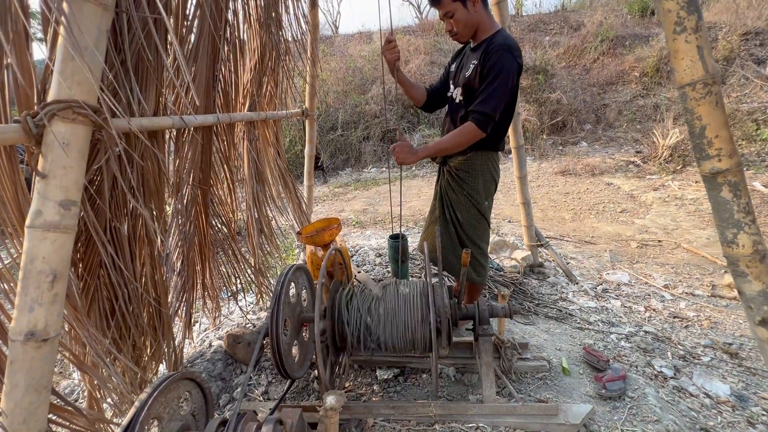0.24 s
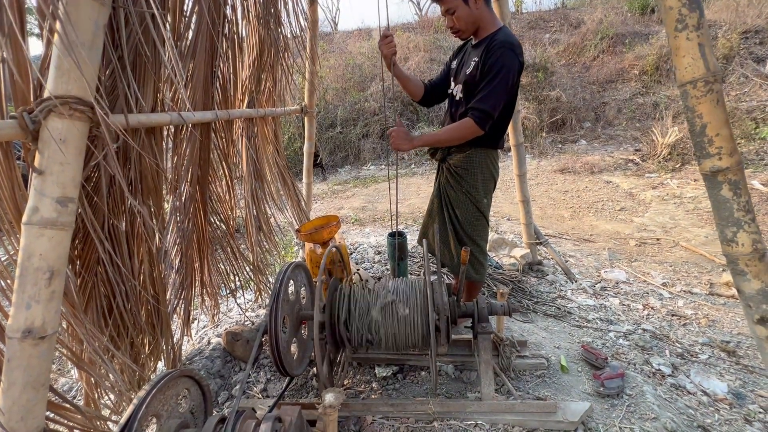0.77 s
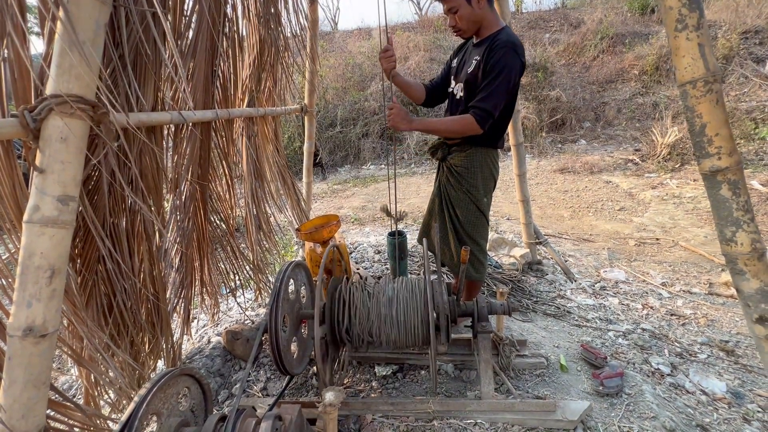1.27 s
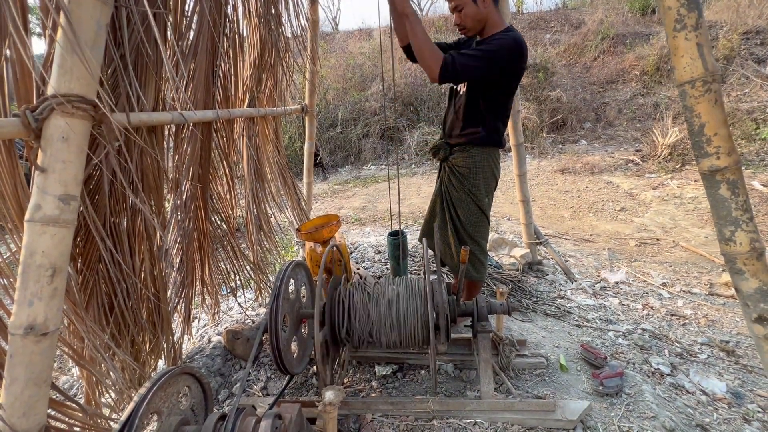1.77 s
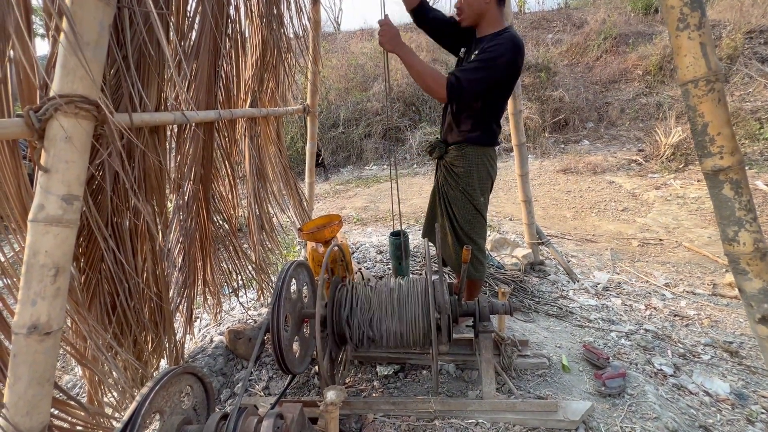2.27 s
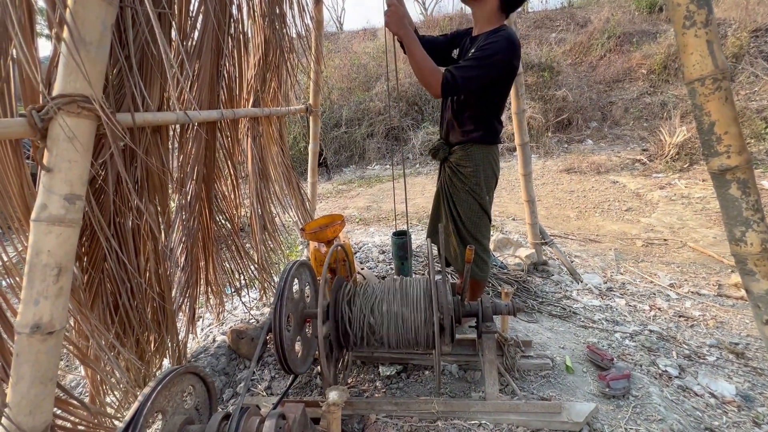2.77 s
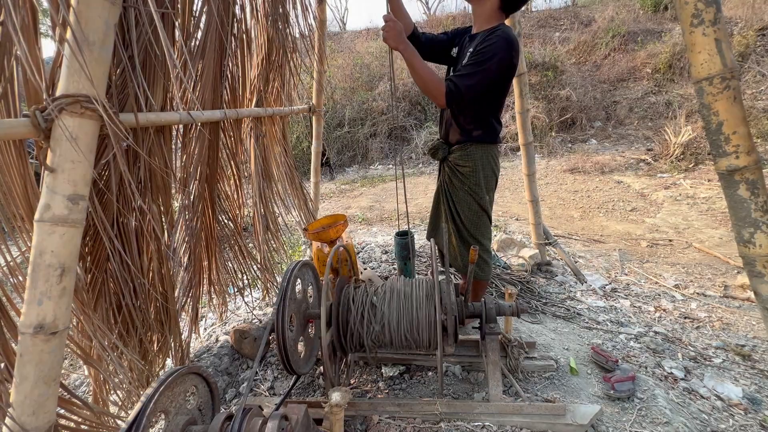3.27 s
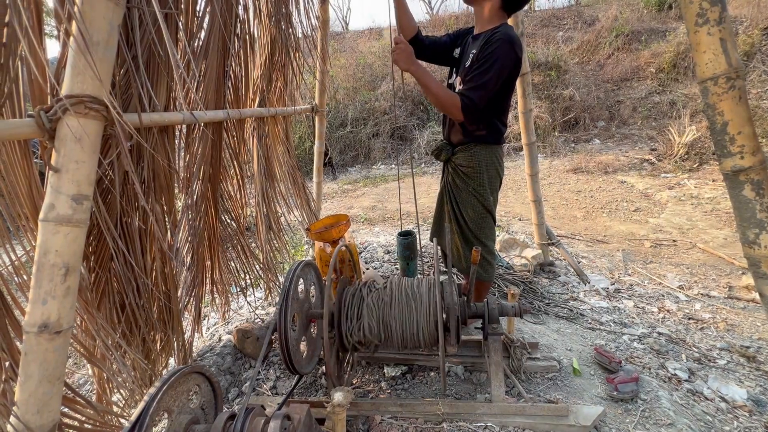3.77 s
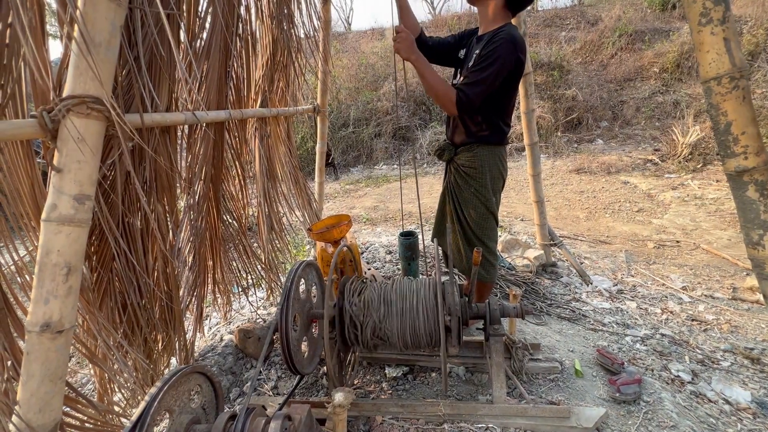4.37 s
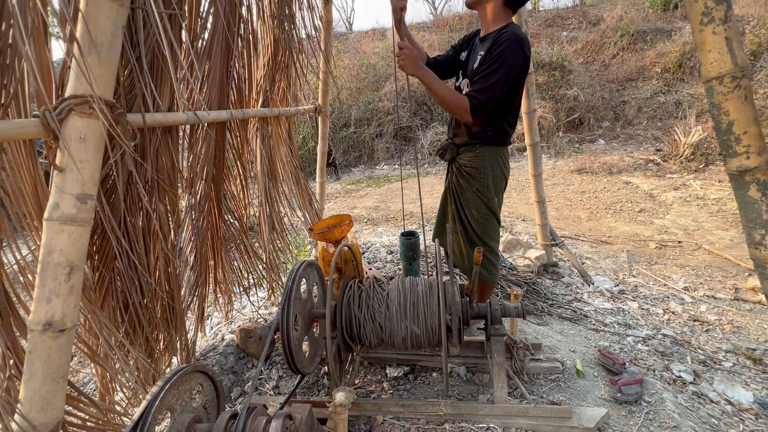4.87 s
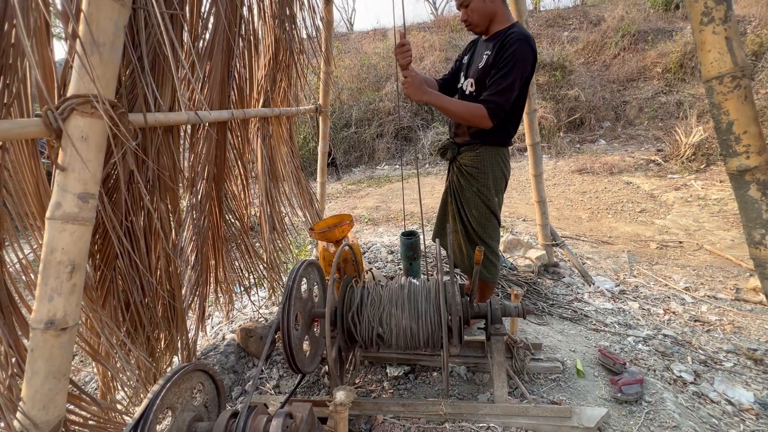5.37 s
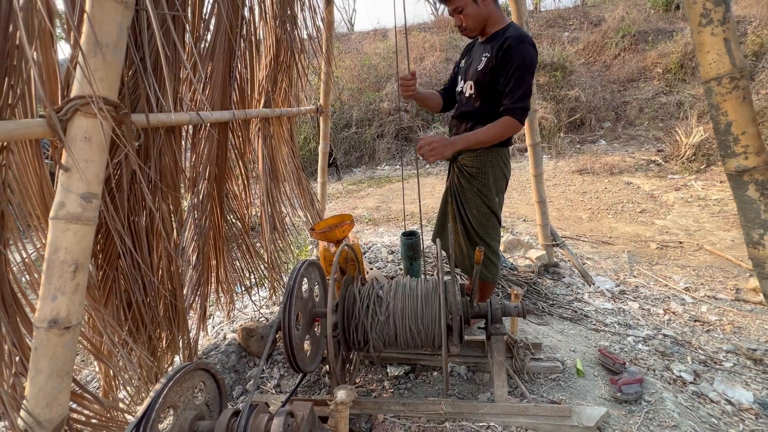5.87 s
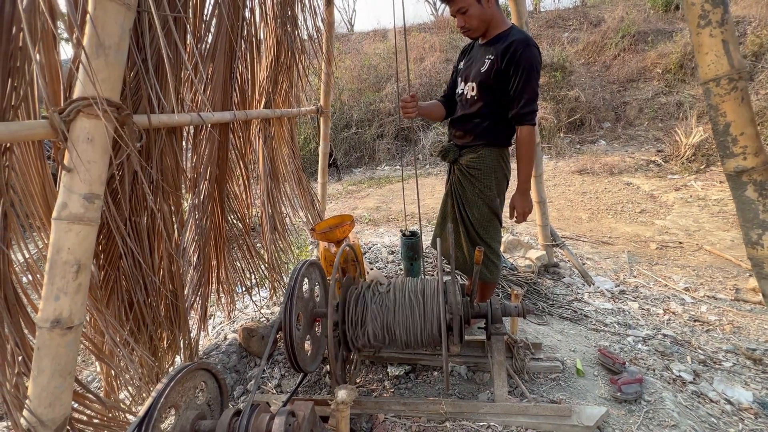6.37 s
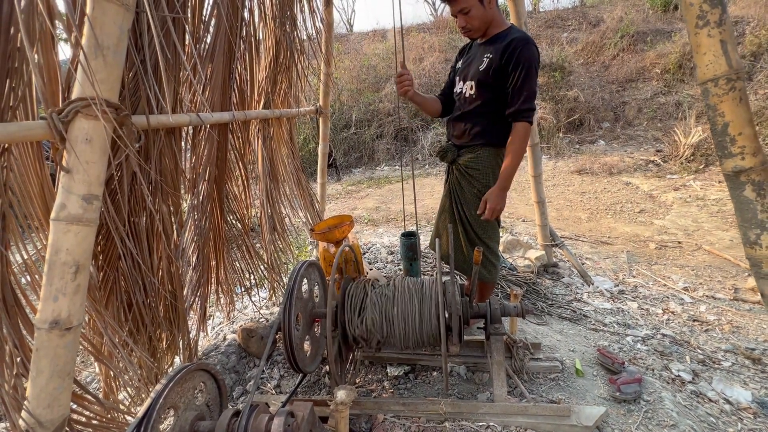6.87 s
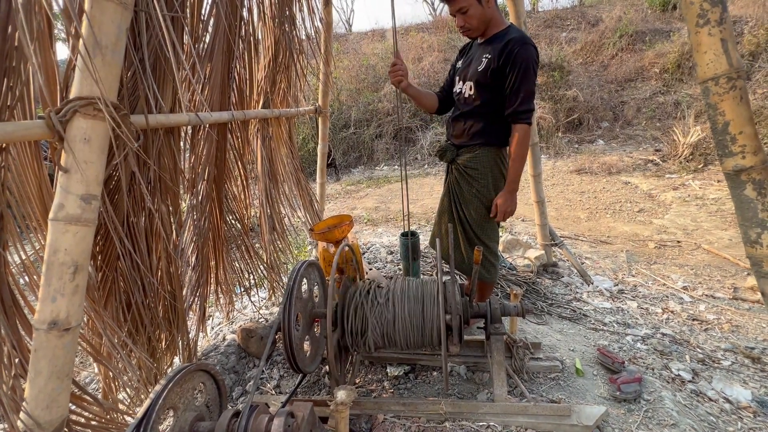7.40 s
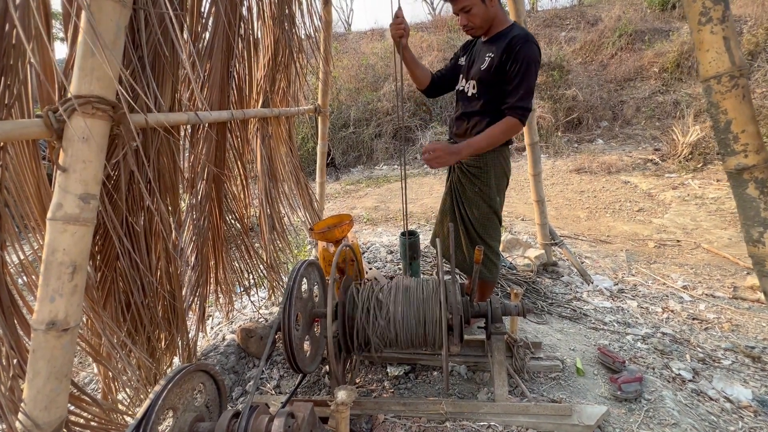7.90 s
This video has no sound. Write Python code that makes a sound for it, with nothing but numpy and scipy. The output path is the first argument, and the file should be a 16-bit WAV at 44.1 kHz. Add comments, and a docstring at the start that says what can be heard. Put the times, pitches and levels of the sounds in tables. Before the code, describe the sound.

Steel cable clatters and scrapes over a small iron winch drum in quick uneven bursts, with wire squeaks and snaps, outdoors in a faint breeze.

```python
"""A small winch at a hand-worked oil well pays out steel cable, a few metres from a phone under a thatched shelter.
Drum, wheel and cable knock and scrape in quick uneven bursts: runs of tiny impacts drive damped and ringing modes.
Wires squeak and snap (chirps, noise cracks), loose parts tap (decaying sines), the wooden base thuds (low noise).
The axle rubs softly (coloured noise), the shelter adds a short dull tail, and a breeze rumbles on the microphone."""
import sys
import numpy as np
from scipy import signal
from scipy.fft import rfft, irfft
from scipy.io import wavfile

SR = 44100
rng = np.random.default_rng(int(sys.argv[2]) if len(sys.argv) > 2 else 0)


def log_audio(samples):
    """Write samples as a 16-bit WAV file to the path given in sys.argv[1]."""
    # one column per channel
    frames = np.atleast_2d(samples).T
    # limit to full scale, then quantise
    limited = np.clip(frames, -1, 1)
    pcm = np.round(limited * 32767).astype(np.int16)
    wavfile.write(sys.argv[1], SR, pcm)


N = 358974
RING_SIZE = 8192  # samples per contact
TIME_S = np.arange(N) / SR
AGE_S = np.arange(RING_SIZE) / SR
FREQS_HZ = np.fft.rfftfreq(RING_SIZE, 1 / SR)
SCENE_FREQS_HZ = np.fft.rfftfreq(N, 1 / SR)
LEFT_RIGHT = np.array([[1], [-1]])
TYPICAL_DB = -8.5  # strength of a typical burst

# phase by which the left port leads the right: (frequency [Hz], phase [rad])
PORT_LEAD = [(200, 0.5), (600, 0.4), (2550, 1.01), (2900, 0.67), (3700, 2.5), (5100, 5.5), (6400, 7.5),
             (7700, 7), (9500, 9.5), (11500, 11.5)]


def clatter(ring_db=18, squeak_db=-8, thin_squeak=0.97, knock_s=0.0001, rasp_s=0.00055, level_db=-23):
    """Impacts drive the damped frame and the ringing drum; squeaks stand out where clunk and edge are weak."""
    out = np.zeros((2, N))
    lead_rad = np.interp(FREQS_HZ, *np.transpose(PORT_LEAD))
    ports = np.exp(-1j * lead_rad * np.array([[0], [1]]))
    clunk_band = np.interp(FREQS_HZ, [200, 700, 1350, 1900], [0, 1, 1, 0])
    edge_band = np.interp(FREQS_HZ, [3050, 3800], [0, 1])
    fine = np.minimum(FREQS_HZ / (SR / 4), 1)
    for time_s, db, length_ms, clunk_db, edge_db in np.vstack([contacts(), stray_ticks()]):
        # the whole cable knocks at once; its fine strands rasp in the treble a moment later
        knock = np.sqrt(1 - fine) * scrape(length_ms, knock_s)
        rasp = np.sqrt(fine) * scrape(length_ms + 2, rasp_s)
        # spectra multiply: the impacts excite every mode
        iron = unit(irfft((knock + rasp) * (clash() + undb(ring_db) * ring())))
        squeak_level_db = squeak_db - thin_squeak * (clunk_db + edge_db) / 2
        squeak = unit(irfft(squeaks(length_ms))) * undb(squeak_level_db)
        tone_db = clunk_db * clunk_band + edge_db * edge_band
        blow = rfft(unit(iron + squeak)) * undb(db + level_db + tone_db)
        add(out, time_s, waveform(blow * ports))
    return out


# bursts of the cable on the drum: (time [s], relative strength [dB], scrape length [ms], treble edge [dB])
BURSTS = [(0.024, -9.5, 31, 2.5), (.054, -10.5, 3.5, -2), (0.152, -14, 5.6, -1.5), (0.184, -16.5, 7.1, 8.5),
          (.3, -2, 25, -5.5), (.344, -9, 34, -1), (.349, -7.5, 2.4, 6.5), (0.403, -13, 14, 3),
          (0.435, -14, 53, -4), (.519, -6, 16, -0.5), (0.614, -19.5, 3, 1), (0.664, -15.5, 3.5, 7.5),
          (0.782, -6, 23, -1.5), (0.828, -6, 9.9, -3), (.854, -7, 20, 1.5), (0.887, -8.5, 23, 3),
          (0.964, -11, 16, -1), (.987, -10.5, 14, 3), (1.156, -13.5, 6.4, 4.5), (1.243, -4.5, 37, -1.5),
          (1.255, -4.5, 2.5, -10), (1.304, -16.5, 14, 4.5), (1.344, -12, 9.2, -0.5), (1.362, -7, 20.3, 1.5),
          (1.425, -16.5, 35, -3), (1.471, -8, 16, 2), (1.616, -12.5, 10, 1), (1.643, -13.5, 15, 0),
          (1.741, -5.5, 22, -2), (1.814, -5, 12, -5), (1.866, -11.5, 3.4, 1.5), (1.911, -9, 36, -2),
          (1.977, -8.5, 6.4, -2), (2.133, -11, 28, -1.5), (2.182, -18.5, 2.1, 8), (2.268, -5.5, 19, -6.5),
          (2.355, -5.5, 42, -4), (2.479, -12.5, 16.5, -1), (2.521, -8, 16, 0), (2.656, -6.5, 6.1, -5.5),
          (2.691, -11, 30, -5), (2.837, -7.5, 18, 4), (2.894, -7.5, 51, -1), (2.939, -9, 27, -4),
          (2.978, -12.5, 18, 2.5), (3.041, -13, 46, 2), (3.09, -9, 16, 0), (3.221, -6.5, 7, -1),
          (3.274, -18, 8, 8), (3.398, -5, 4, 0), (3.411, -6, 40, -1.5), (3.482, -8, 40, -1.5),
          (3.538, -8.5, 5.3, -6.5), (3.592, -12, 9.4, 0), (3.64, -11, 27, 0.5), (3.81, -21.5, 9.1, 6),
          (3.828, -14, 5, -5), (3.854, -13, 8.5, 3.5), (3.899, -16, 90, -5.5), (4.036, -9.5, 17, -1.5),
          (4.114, -19, 11, -2), (4.136, -7.5, 41, -2.5), (4.223, -16, 14, 1), (4.278, -14.5, 46, -0.5),
          (4.338, -12.5, 6.5, 1), (4.556, -16, 5.5, 5.5), (4.722, -6, 14.5, -0.5), (4.827, -9.5, 19, -3),
          (4.922, -16, 20, 1.5), (5.018, -10, 12.3, 1), (5.177, -11.5, 6.5, -7.5), (5.218, -14.5, 43, 0),
          (5.373, -6, 23.6, -0.5), (5.49, -9, 3, -3), (5.512, -2.5, 26.6, -1), (5.638, -16.5, 20, 1.5),
          (5.669, -8, 9.7, -0.5), (5.824, -14, 11, -6), (5.873, -18, 3.3, -2.5), (5.9, -16, 24, 1),
          (5.974, -8, 16, -3), (6.008, -8.5, 18.8, -6), (6.105, -6, 31, 0), (6.234, -14.5, 19, 3),
          (6.275, -7, 22, -0.5), (6.402, -7.5, 24, -4), (6.536, -8.5, 23, 0.5), (6.639, -13.5, 50, -3),
          (6.677, -6.5, 45, -1), (6.701, -6.5, 34, 0), (6.802, -8.5, 6.2, 2), (6.919, -11, 5.7, -3),
          (6.944, -13, 37, 0), (7.017, -11.5, 11.5, -3.5), (7.09, -8, 22, 4), (7.156, -7.5, 7, -4.5),
          (7.174, -4, 50, -2), (7.277, -8.5, 11, -2), (7.289, -9, 5.1, 2), (7.401, -7.5, 27, -4),
          (7.477, -9.5, 4.9, -1.5), (7.523, -15, 19, 1.5), (7.581, -1.5, 33, -2.5), (7.644, -3, 46, 0.5),
          (7.752, -5, 8.1, 1), (7.874, -10.5, 49, -3), (8.013, -2.5, 56, -1.5), (8.074, -1, 62, 0)]


def contacts(clunk_db=1.5, clunk_per_edge=0.41, clunk_per_strength=-0.17):
    """Bursts and grazes; hard bites ring more than they clunk: rows (s, dB, length ms, clunk dB, edge dB)."""
    time_s, db, length_ms, edge_db = np.vstack([BURSTS, grazes()]).T
    clunks_db = clunk_db + clunk_per_edge * edge_db + clunk_per_strength * (db - TYPICAL_DB)
    return np.column_stack([time_s, db, length_ms, clunks_db, edge_db])


def grazes(lead_s=0.04, scatter_s=0.0059, graze_db=-13.5, follows=0.47, length_ms=12, edge_db=1.5, pause_s=0.075):
    """After a pause the cable grazes the drum just before it bites: rows like those of the bursts."""
    time_s, db, _, _ = np.transpose(BURSTS)
    early, length, edge = rng.standard_normal((len(time_s), 3)).T
    rows = np.column_stack([
        time_s - lead_s + scatter_s * early,
        TYPICAL_DB + graze_db + follows * (db - TYPICAL_DB),
        length_ms * np.exp(0.4 * length),
        edge_db + 2 * edge])
    return rows[np.diff(time_s, prepend=-1) > pause_s]


# course of the light rattle: (time [s], relative level [dB])
RATTLE_LEVEL = [(0.0, -41), (0.32, -35), (3.54, -32), (3.67, -51), (4.15, -36.5), (4.4, -35), (4.78, -35.5),
                (5.87, -36.5), (6.05, -25.5), (6.71, -42.5), (7.07, -31), (8.14, -34)]


def stray_ticks(level_db=12, spread_db=3, length_ms=7, length_spread=0.71, clunk_db=4, edge_db=2, count=70):
    """Slack turns of cable tap and rub lightly at random: rows like those of the contacts."""
    jitter = rng.random(count)
    size, length, clunk, edge = rng.standard_normal((count, 4)).T
    times_s = (np.arange(count) + jitter) / count * N / SR
    db = np.interp(times_s, *np.transpose(RATTLE_LEVEL)) + level_db + spread_db * size
    lengths_ms = length_ms * np.exp(length_spread * length)
    return np.column_stack([times_s, db, lengths_ms, clunk_db + 4 * clunk, edge_db + 3 * edge])


def scrape(length_ms, attack_s, spread_db=6, impacts_hz=2500, judder_db=5.5, judder_hz=297.0, bite_db=3, bite_s=0.0025):
    """Spectrum of one contact: wire strands catch in a juddering run of tiny impacts that dies away."""
    pressure = (1 - np.exp(-AGE_S / attack_s)) * np.exp(-(1000 * AGE_S / max(length_ms, 1)) ** 2)
    catches = rng.random(RING_SIZE) < impacts_hz / SR
    scatter_db = spread_db * rng.standard_normal(RING_SIZE).clip(-2, 2)
    first_bite_db = bite_db * np.exp(-AGE_S / bite_s)  # the first strands bite hardest
    sizes = undb(scatter_db + judder_db * walk(AGE_S, judder_hz) + first_bite_db)
    signs = rng.choice([-1, 1], RING_SIZE)
    return rfft(unit(catches * sizes * signs * np.sqrt(pressure) + 1e-18))  # offset avoids 0/0


# drum and wheel modes: (frequency [Hz], relative left level [dB], relative right level [dB], 60 dB decay [s])
RING_MODES = [(702, -22, -27, 0.017), (1209.7, -6, -3.5, 0.08), (1298, -13, -3.5, 0.16),
              (1378, -10.5, -8.5, 0.27), (1862, -14, -7, 0.27), (2170, -47, -4.5, 0.019),
              (2560, -8, 2, 0.05), (2661, -8, 4, 0.24), (2675, 5, 6.5, 0.099), (2880, -37, -9.5, 0.21),
              (3004, -3, -4, 0.19), (3550, -19, -36, 0.018), (3290, -1, -22, 0.061), (3475, -4, -16, 0.11),
              (3780, -2.5, -11, 0.065), (4385, 3.5, -1, 0.026), (5047, -17, -4.5, 0.085),
              (5760, 0, -44, 0.17), (6000, -10, -5, 0.047), (6210, 1.5, -1, 0.015), (6050, 3, -4.5, 0.07)]


def ring(detune=0.0068, spot_db=2.5, port_scatter_rad=0.3):
    """Spectrum of the iron modes, resonant peaks; each contact spot weights and detunes them differently."""
    hz, left_db, right_db, t60_s = np.transpose(RING_MODES)
    shift, weight, turn, skew = rng.standard_normal((4, len(hz)))
    half_width_hz = (np.log(1000) / (2 * np.pi * t60_s))[:, None]
    mode_hz = (hz * (1 + detune * shift))[:, None]
    shapes = np.sqrt(half_width_hz) / (half_width_hz + 1j * (FREQS_HZ - mode_hz))
    phases_rad = 2 * np.pi * turn + port_scatter_rad * skew * LEFT_RIGHT
    gains = undb(np.array([left_db, right_db]) + spot_db * weight) * np.exp(1j * phases_rad)
    return np.einsum("cm,mf->cf", gains, shapes)


# colour of the frame and cable: (frequency [Hz], relative left level [dB], relative right level [dB])
CLASH_COLOUR = [(90, -33, -19.5), (264, -13, -8.5), (500, -14.5, -8), (690, -10.5, -3.5), (1010, -13, -8.5),
                (1360, -2, -4), (1620, -6.5, -4.5), (2770, -5, 5), (3550, 0.5, -4), (4800, -1, -13),
                (6580, -7, -5.5), (7240, -10.5, -22), (9110, -10, -15.5), (10070, -21, -18.5),
                (16300, -32, -34)]


def clash(t60_s=0.053, tick_gain=0.089, likeness=0.58):
    """Spectrum of dense damped modes: a direct tick plus a short noise hash that the two ports partly share."""
    shared, *own = unit(rng.standard_normal((3, RING_SIZE)) * fade(AGE_S, t60_s)) / np.sqrt(RING_SIZE)
    hash_noise = np.sqrt(likeness) * shared + np.sqrt(1 - likeness) * np.array(own)
    return colour(CLASH_COLOUR, FREQS_HZ) * (rfft(hash_noise) + tick_gain)


def squeaks(length_ms, pitches_hz=(2350, 2800, 2950, 3100, 6100), scatter=0.056, swell_s=0.002, spread_db=5,
            pan_db=5, count=3):
    """Spectrum of single wires that stick and slip: chirps of a few milliseconds within a contact."""
    pitch, size, pan = rng.standard_normal((3, count, 1))
    hz = rng.choice(pitches_hz, (count, 1)) * (1 + scatter * pitch)
    starts_s = rng.random((count, 1)) * length_ms / 1000
    age_s = np.maximum(AGE_S - starts_s, 0)
    swell = age_s * np.exp(-age_s / swell_s)
    chirps = swell * np.sin(2 * np.pi * hz * age_s) * undb(spread_db * size)
    return rfft(undb(pan_db * pan.T * LEFT_RIGHT) @ chirps)


# single wires snapping over the ridges of the winding: (time [s], relative level [dB])
WIRE_SNAPS = [(0.185, -33), (0.6664, -28), (1.1603, -24), (1.5224, -18), (1.6182, -37), (1.8692, -29),
              (2.6604, -25), (3.2226, -21), (4.7227, -37), (5.1781, -49), (5.5154, -22), (6.108, -24),
              (6.4033, -32), (6.797, -37), (6.9217, -27), (7.0933, -31), (7.3475, -19.5), (7.481, -22),
              (7.58, -28), (8.089, -17)]


def snaps(low_hz=3000, high_hz=14000, t60_s=0.02, level_db=-5):
    """A taut wire lets go with one short, bright crack of decaying noise."""
    out = np.zeros((2, N))
    band = signal.butter(1, [low_hz, high_hz], "bandpass", fs=SR, output="sos")
    for time_s, db in WIRE_SNAPS:
        crack = signal.sosfilt(band, rng.standard_normal((2, RING_SIZE)) * fade(AGE_S, t60_s))
        add(out, time_s, undb(db + level_db) * crack)
    return out


# hollow knocks of loose parts: (time [s], relative level [dB], pitch [Hz])
LOOSE_KNOCKS = [(0.121, -26, 791), (0.602, -27, 750), (0.629, -46, 554), (1.092, -25, 740),
                (1.109, -36, 970), (3.288, -22.5, 471), (3.781, -31, 740), (4.461, -28.5, 732)]


def knocks(t60_s=0.033, attack_s=0.0027, level_db=-2.5):
    """A loose part taps and rings briefly at one pitch."""
    out = np.zeros((2, N))
    for time_s, db, hz in LOOSE_KNOCKS:
        envelope = (1 - np.exp(-AGE_S / attack_s)) * fade(AGE_S, t60_s)
        tone = np.sin(2 * np.pi * hz * AGE_S) * envelope
        add(out, time_s, undb(db + level_db) * tone[None])
    return out


# dull knocks of the wooden base: (time [s], relative level [dB])
BASE_THUDS = [(0.526, -40), (0.748, -56), (3.287, -42.5), (7.76, -52)]


def thuds(low_hz=130, high_hz=480, t60_s=0.19, level_db=-7):
    """The timber base knocks dully: decaying noise in a low band."""
    out = np.zeros((2, N))
    wood = signal.butter(2, [low_hz, high_hz], "bandpass", fs=SR, output="sos")
    for time_s, db in BASE_THUDS:
        knock = unit(signal.sosfilt(wood, rng.standard_normal((1, RING_SIZE)) * fade(AGE_S, t60_s)))
        add(out, time_s, undb(db + level_db) * knock)
    return out


# course of the axle rub: (time [s], relative level [dB])
AXLE_LEVEL = [(0.0, -43), (3.54, -48.5), (3.66, -50), (4.14, -49.5), (5.16, -50), (5.58, -43),
              (6.42, -47.5), (8.14, -43.5)]
# spectrum of the axle rub: (frequency [Hz], relative density [dB per Hz])
AXLE_SPECTRUM = [(60, -21), (180, -2), (350, 2), (500, -3), (720, -3), (1000, -6.5), (2700, -14.5),
                 (6000, -10.5), (10000, -22), (16000, -34)]


def axle(level_db=-2, width=0.48):
    """The turning axle rubs softly in its bearings: coloured noise, narrowed in stereo."""
    mid, side = noise(AXLE_SPECTRUM)
    return (mid + width * side * LEFT_RIGHT) * undb(curve(AXLE_LEVEL) + level_db)


def shelter(x, t60_s=0.28, dull_hz=3500, rise_s=0.016, wet_db=-20.0):
    """Ground and thatch scatter a short, dull tail: convolution with decaying noise."""
    age_s = np.arange(SR // 2) / SR
    tail = rng.standard_normal((2, len(age_s))) * fade(age_s, t60_s) * np.minimum(age_s / rise_s, 1)
    dull = signal.butter(1, dull_hz, fs=SR, output="sos")
    tail = unit(signal.sosfilt(dull, tail)) / np.sqrt(len(age_s))
    return undb(wet_db) * signal.fftconvolve(x, tail, axes=1)[:, :N]


# spectrum of the breeze: (frequency [Hz], relative density [dB per Hz])
BREEZE_SPECTRUM = [(15, -34), (35, -13), (60, -1), (100, -2), (160, -8), (300, -24), (2000, -65)]


def breeze(flutter_db=4.5, flutter_hz=12, side_db=2, level_db=-0.5):
    """Eddies buffet each port on its own, the left one more: low noise with a fluttering level."""
    balance_db = side_db * LEFT_RIGHT
    flutter = flutter_db * walk(TIME_S, flutter_hz)
    return noise(BREEZE_SPECTRUM) * gusts() * undb(flutter + balance_db + level_db)


# gusts on the microphone: (time [s], relative level [dB], half length to 1/e [s])
GUST_ROWS = [(.35, -46, 0.56), (1.35, -46, 0.51), (2.048, -44, .1), (3.41, -48, 0.022), (4.75, -49, 0.25),
             (5.445, -40.5, 0.32), (7.157, -45, 0.24), (7.775, -37, 0.07), (8.05, -28, 0.12)]


def gusts(calm_db=-53.5):
    """Strength of the breeze: each gust swells and dies over the calm, powers adding."""
    power = undb(calm_db) ** 2
    for time_s, db, half_s in GUST_ROWS:
        power = power + (undb(db) * np.exp(-((TIME_S - time_s) / half_s) ** 2)) ** 2
    return np.sqrt(power)


def undb(db):
    """Decibels to gain."""
    return 10 ** (np.asarray(db) / 20)


def unit(x):
    """Scale to rms 1."""
    return x / np.sqrt(np.mean(x ** 2))


def fade(age_s, t60_s):
    """Exponential decay, 60 dB down at t60_s."""
    return undb(-60 * age_s / t60_s)


def curve(rows):
    """Join (s, value) rows by straight lines."""
    return np.interp(TIME_S, *np.transpose(rows))


def walk(times_s, rate_hz):
    """Random levels, rate_hz a second, joined by straight lines."""
    knots_s = np.arange(0, times_s[-1], 1 / rate_hz)
    return np.interp(times_s, knots_s, rng.standard_normal(len(knots_s)))


def colour(rows, freqs_hz):
    """Gains of (Hz, dB, ..) rows on a log-frequency axis, one line for each dB column."""
    hz, *columns = np.transpose(rows)
    return undb([np.interp(np.log(freqs_hz + 1), np.log(hz), column) for column in columns])


def noise(rows):
    """Coloured noise of rms 1, unrelated left and right."""
    white = rng.standard_normal((2, N))
    return unit(irfft(rfft(white) * colour(rows, SCENE_FREQS_HZ), N))


def waveform(spectrum, lead_in=32):
    """Spectrum to sound, with a lead-in of a few samples for the attack and a tail that closes smoothly."""
    close = np.minimum((RING_SIZE - np.arange(RING_SIZE)) / (RING_SIZE / 2), 1)
    return np.roll(irfft(spectrum), lead_in, axis=1) * close


def add(out, time_s, sound):
    """Mix a sound in at time_s."""
    start = max(int(time_s * SR), 0)
    part = out[:, start:start + RING_SIZE]
    part += sound[:, :part.shape[1]]


def scene():
    """The winch under its shelter, in a light breeze."""
    winch = clatter() + snaps() + knocks() + thuds()
    return winch + axle() + shelter(winch) + breeze()


# treble response of the microphone ports: (frequency [Hz], gain [dB])
MIC_RESPONSE = [(9300, 0.5), (10300, -10), (11800, 4.5), (12700, -0.5), (13500, -2), (14700, -2),
                (16000, 5)]


def record(dry, top_hz=15800):
    """The phone's ports ripple the treble, and a steep low-pass cuts the top."""
    heard = irfft(rfft(dry) * colour(MIC_RESPONSE, SCENE_FREQS_HZ), N)
    low_pass = signal.ellip(8, 0.2, 70, top_hz, fs=SR, output="sos")
    return signal.sosfilt(low_pass, heard)


dry = scene()
out = record(dry)
log_audio(out)
```